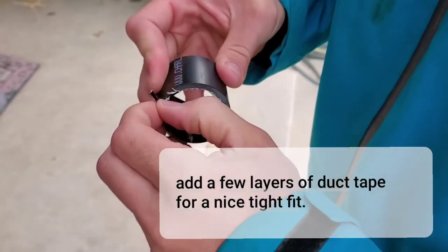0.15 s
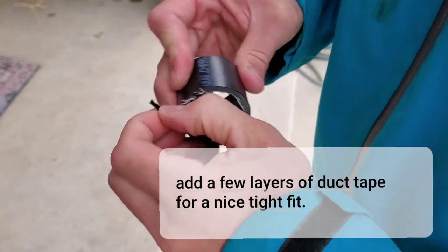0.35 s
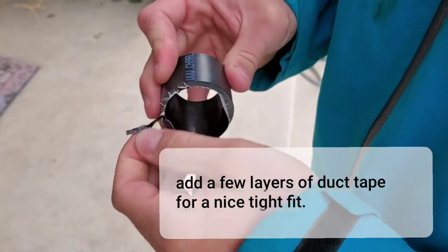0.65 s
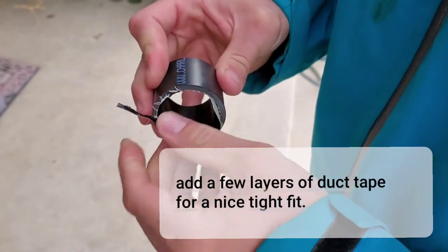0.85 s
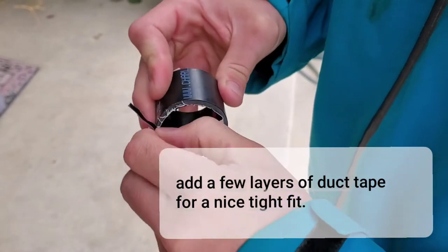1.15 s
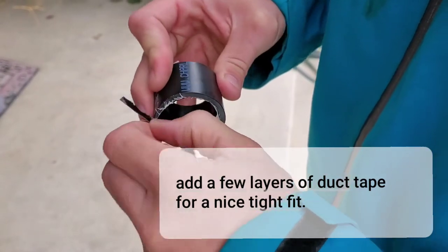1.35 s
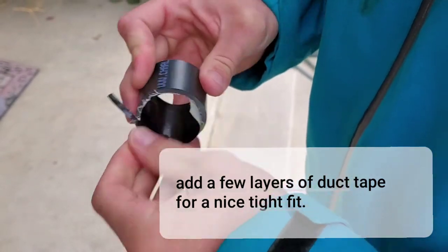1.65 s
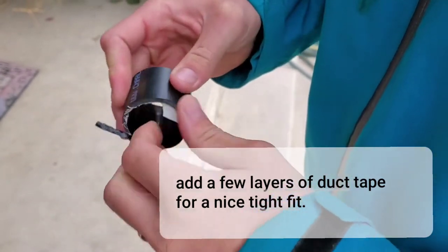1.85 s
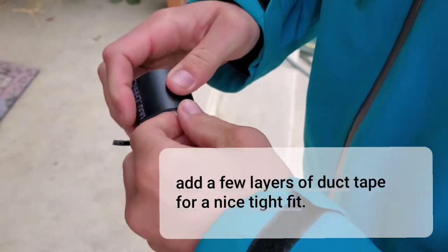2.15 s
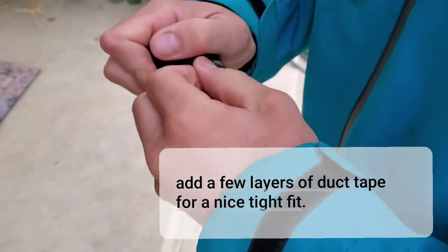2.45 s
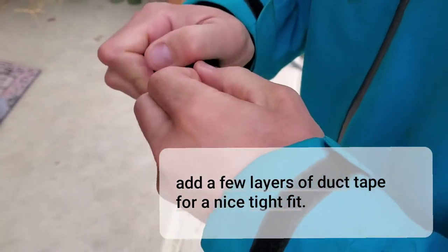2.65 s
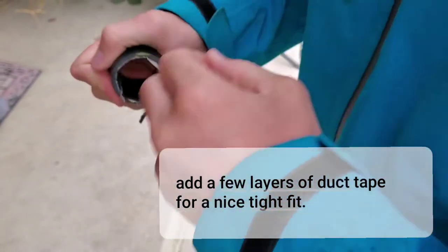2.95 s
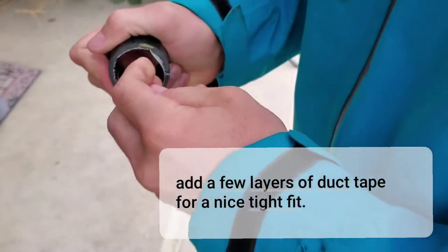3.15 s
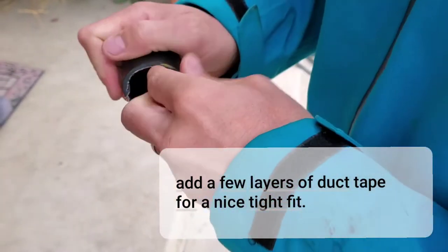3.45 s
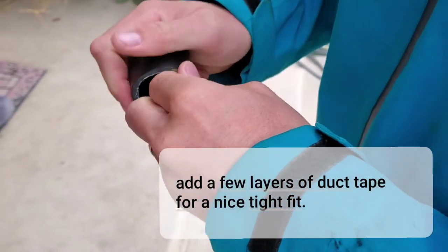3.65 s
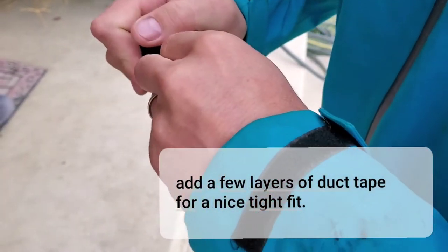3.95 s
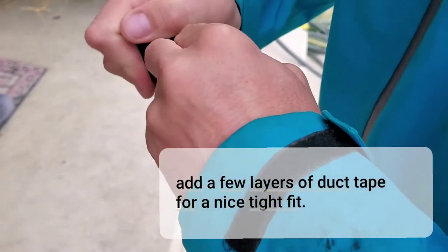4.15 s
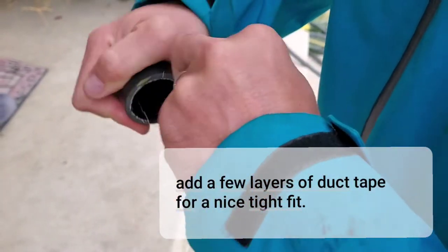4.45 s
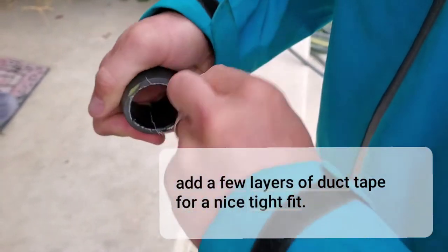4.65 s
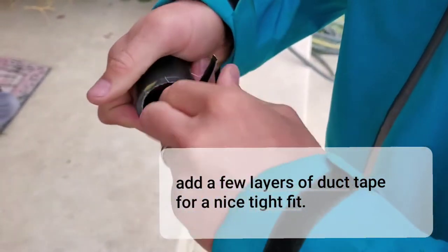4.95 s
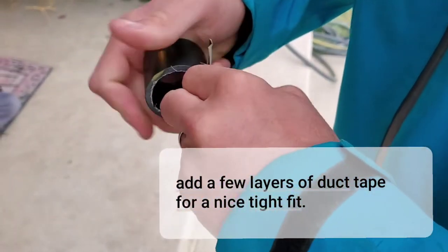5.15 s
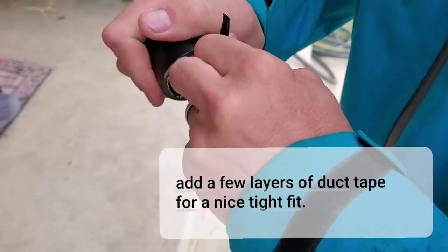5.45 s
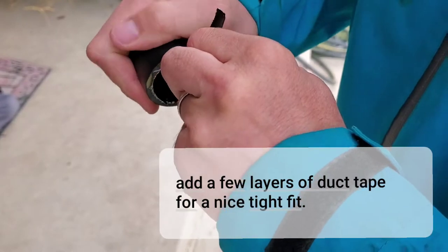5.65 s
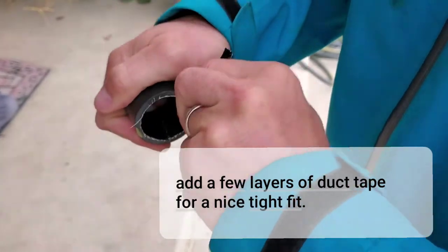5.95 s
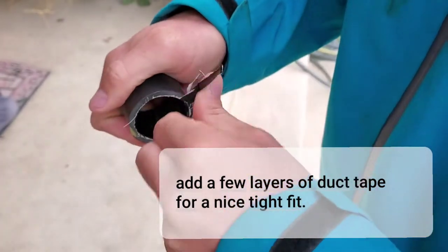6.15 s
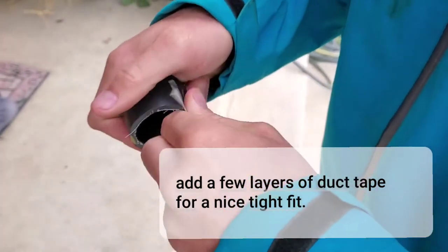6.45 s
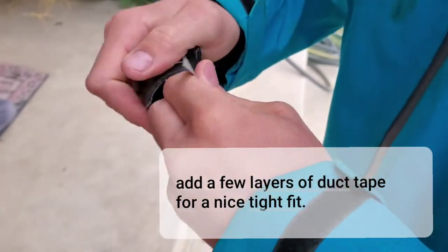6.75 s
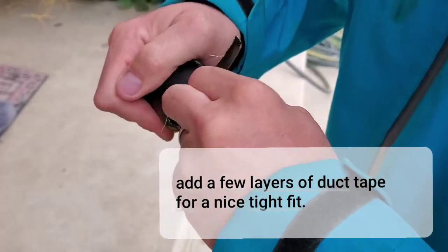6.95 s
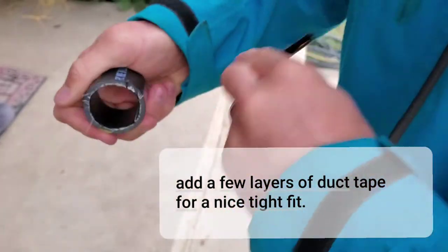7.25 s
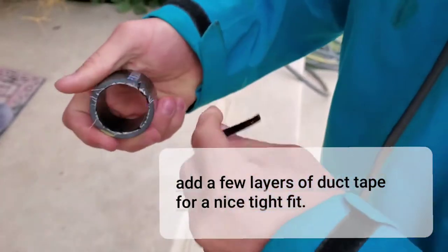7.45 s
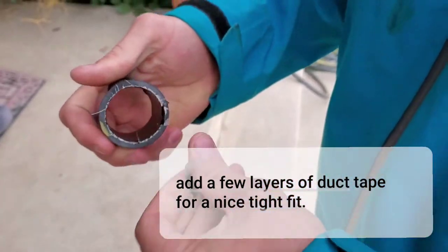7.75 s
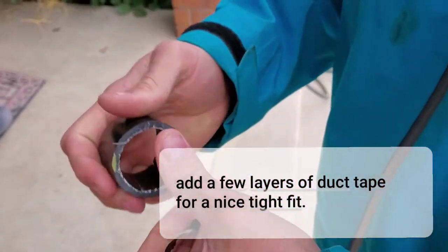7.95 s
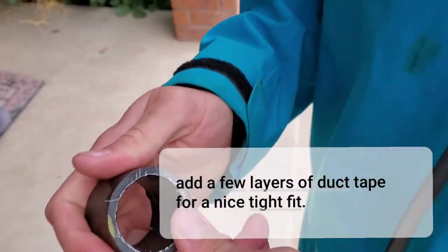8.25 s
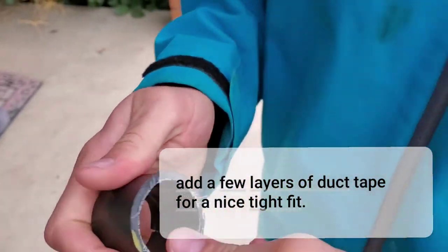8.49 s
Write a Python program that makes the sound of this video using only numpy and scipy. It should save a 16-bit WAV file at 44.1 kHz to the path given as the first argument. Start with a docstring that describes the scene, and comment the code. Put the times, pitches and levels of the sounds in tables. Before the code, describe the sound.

Close, sharp little rips of duct tape on a plastic pipe, among jacket rustles, handling thuds and a steady low hum.

```python
"""Duct tape is torn by hand off the end of a short plastic pipe, close to a hand-held microphone.
Threads part in runs of sharp snaps over crackling glue; both ring the taut tape and the pipe.
A nylon jacket swishes, flaps and faintly squeaks as the arms move, and handling adds dull bumps.
Behind it lie a steady low rumble, a faint hiss and two motor hums."""
import sys
import numpy as np
from scipy import signal
from scipy.fft import rfft, irfft, next_fast_len
from scipy.io import wavfile
from scipy.ndimage import uniform_filter1d

SR = 44100
rng = np.random.default_rng(int(sys.argv[2]) if len(sys.argv) > 2 else 0)


def dump(signal):
    """Clip the signal to [-1, 1] and save it as 16-bit WAV at the path in sys.argv[1]."""
    limited = np.clip(np.atleast_2d(signal).T, -1, 1)
    pcm = np.round(limited * 32767).astype(np.int16)
    wavfile.write(sys.argv[1], SR, pcm)


N = 380141
TIME = np.arange(N) / SR


def from_db(db):
    """Decibels to gain."""
    return 10 ** (np.asarray(db) / 20)


def unit_rms(x):
    """Scale to rms 1."""
    return x / np.sqrt(np.mean(x ** 2) + 1e-20)


def in_time(rows):
    """Interpolate each column of a time curve per sample."""
    times_s, *columns = np.transpose(rows)
    return [np.interp(TIME, times_s, column) for column in columns]


def at_hz(points, hz):
    """Interpolate a spectrum on a log-frequency axis."""
    knots_hz, values = np.transpose(points)
    return np.interp(np.log(hz + 1), np.log(knots_hz), values)


def butter(x, hz, kind, order=2):
    """Causal Butterworth filter."""
    return signal.sosfilt(signal.butter(order, hz, kind, fs=SR, output="sos"), x + 1e-18)


def band(x, low_hz, high_hz, order=2):
    """Causal band-pass."""
    return butter(x, [low_hz, high_hz], "band", order)


def resonator(x, hz, width_hz):
    """Two-pole resonance, peak gain 1."""
    r = np.exp(-np.pi * width_hz / SR)
    numerator = np.array([1, 0, -1]) * (1 - r * r) / 2
    return signal.lfilter(numerator, [1, -2 * r * np.cos(2 * np.pi * hz / SR), r * r], x + 1e-18)


def resonate(x, modes):
    """Parallel resonances with alternating signs."""
    return sum((-1) ** k * from_db(db) * resonator(x, hz, width_hz)
               for k, (hz, width_hz, db) in enumerate(modes))


def drift(rate_hz):
    """Smooth random curve, rms 1."""
    knots = rng.standard_normal(N // 20)
    return unit_rms(np.interp(TIME * rate_hz, np.arange(len(knots)), knots))


def evened(x, window_s):
    """Level out the slow swells of a noise; rms 1."""
    return x / np.sqrt(uniform_filter1d(np.mean(x ** 2, axis=0), int(window_s * SR)) + 1e-12)


# Left-right likeness: (frequency [Hz], correlation [-1..1])
STEREO_CORRELATION = [(60, .997), (130, .993), (290, .94), (640, .35), (1400, -.25), (3000, 0), (15000, 0)]


def stereo_noise(spectrum=((20, 0), (20000, 0))):
    """Coloured noise, alike on both sides in the bass, unrelated in the treble; rms 1."""
    size = next_fast_len(N)
    hz = np.arange(size // 2 + 1) * SR / size
    alike = at_hz(STEREO_CORRELATION, hz)
    mid, side = rfft(rng.standard_normal((2, size))) * from_db(at_hz(spectrum, hz))
    left_right = np.sqrt(1 + alike) * mid + np.sqrt(1 - alike) * side * [[1], [-1]]
    return unit_rms(irfft(left_right, size)[:, :N])


def room(x, t60_s=0.13, tail_db=-9):
    """Reflections add a short diffuse tail, different on each side."""
    t = TIME[:SR // 2]
    tail = rng.standard_normal((2, len(t))) * from_db(-60 * t / t60_s) * (t > .002)
    tail /= np.sqrt(np.sum(tail ** 2, axis=1, keepdims=True))
    return x + from_db(tail_db) * signal.fftconvolve(x, tail, axes=1)[:, :N]


# Background spectra: (frequency [Hz], relative density [dB])
RUMBLE_SPECTRUM = [(12, -45), (20, -2), (53, -30), (66, -5), (87, -1), (109, -10), (212, -18), (397, -28.5),
                   (474, -27), (890, -35), (1770, -41.5), (2200, -50), (2860, -69), (4840, -120)]
HISS_SPECTRUM = [(1060, -54), (1800, -54), (2400, -8), (2630, -10), (3090, -5), (3700, -3), (6650, -4),
                 (7540, -7.5), (13800, -11.5), (15500, -54)]
# Hiss envelope: (time [s], level [dB])
HISS_ENVELOPE = [(2.0, -66), (2.45, -71), (2.65, -75.5), (3.0, -66.5)]


def rumble_and_hiss(rumble_db=-45.5):
    """Steady low rumble; a faint hiss sinks while the hands are still."""
    rumble = from_db(rumble_db) * stereo_noise(RUMBLE_SPECTRUM)
    hiss = from_db(in_time(HISS_ENVELOPE)[0]) * stereo_noise(HISS_SPECTRUM)
    return rumble + hiss


# Steady hum: (frequency [Hz], relative level [dB])
STEADY_MOTOR = [(86.1, -44.5)]
# Wandering hum: (time [s], frequency [Hz], level [dB])
WANDERING_MOTOR = [(0.2, 133.2, -54), (0.8, 138.6, -54), (1.5, 143.3, -56), (2.42, 121.8, -52),
                   (4.65, 119.8, -48), (5.6, 121.8, -50), (6.3, 111.0, -47), (7.15, 115.1, -46),
                   (7.8, 109.0, -47), (8.4, 109.0, -48)]


def motors(steady_db=-0.5, steady_waver_db=1.5, wandering_waver_db=5):
    """One motor holds its speed, the other wanders; both hums waver in level."""
    steady = sum(from_db(db + steady_db + steady_waver_db * drift(7)) * np.sin(2 * np.pi * hz * TIME)
                 for hz, db in STEADY_MOTOR)
    hz, db = in_time(WANDERING_MOTOR)
    wandering = from_db(db + wandering_waver_db * drift(26)) * np.sin(2 * np.pi * np.cumsum(hz) / SR)
    return steady + wandering


# Cloth squeaks: (start [s], end [s], top pitch [Hz], level [dB])
SQUEAKS = [(5.8, 5.912, 947, -53), (6.58, 6.684, 915, -57.5), (6.785, 7.046, 341, -40),
           (7.14, 7.305, 500, -50), (7.298, 7.434, 308, -47), (7.879, 8.098, 231.5, -45.5),
           (8.001, 8.22, 326, -45), (8.3, 8.457, 1230, -49)]


def cloth_squeaks(pitch_arch=0.145, pitch_jitter=0.026, waver_db=2):
    """A sliding weave hums at a pitch that rises and falls with its speed."""
    squeaks = np.zeros(N)
    wobble = 1 + pitch_jitter * drift(90)
    waver = from_db(waver_db * drift(64))
    for start_s, end_s, top_hz, db in SQUEAKS:
        span = slice(int(start_s * SR), int(end_s * SR))
        speed = np.sin(np.linspace(0, np.pi, len(TIME[span])))
        hz = top_hz * (1 - pitch_arch * (1 - speed)) * wobble[span]
        squeaks[span] += from_db(db) * speed * waver[span] * np.sin(2 * np.pi * np.cumsum(hz) / SR)
    return squeaks


# Arm movements: (start [s], length [s], ease [s], relative swish level [dB],
# rasp offset [dB], sheen offset [dB], folds offset [dB])
ARM_STROKES = [(0.0, 0.18, 0.013, -66.5, -32, 0, -1), (0.22, 0.049, 0.013, -52, -14, 1, -4),
               (0.73, 0.13, 0.007, -64, -11, -2, -3), (0.98, 0.049, 0.0091, -65, -15, -7, 7),
               (1.275, 0.066, 0.0058, -64.5, 1, -21, -5), (1.48, 0.16, 0.034, -65.5, -10, -7, -2),
               (1.7, 0.18, 0.024, -62.5, -8, -5.5, 1), (1.995, 0.077, 0.0089, -65.5, 3, 1, 2),
               (2.225, 0.13, 0.0063, -83, 13.5, -11, -3), (2.771, 0.062, 0.026, -35.5, -3, -3.5, -4.5),
               (3.15, 0.63, 0.046, -60.5, -4, -6, 6), (3.92, 0.26, 0.035, -63.5, -15, -18, -6),
               (4.88, 0.21, 0.02, -53.5, -8, -4, 3.5), (5.254, 0.15, 0.023, -36.5, -7.5, -4.5, -11),
               (5.55, 0.092, 0.042, -55, -12, -1, 0), (5.779, 0.06, 0.031, -44.5, -1, -16, 2.5),
               (6.024, 0.2, 0.014, -38, -9.5, -5, -12.5), (6.3, 0.048, 0.018, -58, -11, -1, -3),
               (6.465, 0.13, 0.026, -46, -9, -5, -3), (6.813, 0.14, 0.022, -36.5, -6, -7.5, -9.5),
               (7.2, 0.15, 0.023, -41, -6.5, -7, -3.5), (7.523, 0.2, 0.028, -37.5, -5, -9, -10.5),
               (7.0, 1.75, 0.0067, -59.5, -7.5, -2, 5), (7.973, 0.099, 0.024, -37, -5, -9, -5),
               (8.228, 0.12, 0.02, -35.5, -2, -6.5, -11.5), (8.35, 0.12, 0.015, -41, -2.5, -4.5, -10.5)]


def arm_strokes():
    """Each stroke eases in, holds and eases out; envelopes of rasp, swish, sheen and folds."""
    t, power = TIME[::40], 0
    for start_s, length_s, ease_s, db, rasp_db, sheen_db, folds_db in ARM_STROKES:
        age_s = t - start_s
        speed = (np.tanh(age_s / (2 * ease_s)) - np.tanh((age_s - length_s) / (2 * ease_s))) / 2
        gains = from_db(db + np.array([rasp_db, 0, sheen_db, folds_db]))
        power = power + np.outer(gains, speed) ** 2
    return [np.interp(TIME, t, np.sqrt(p)) for p in power]


def microphone_sway(envelope, gain_db=-7):
    """Each arm stroke jostles the microphone with a soft low rumble."""
    return envelope * from_db(gain_db) * evened(band(stereo_noise(), 58, 125), window_s=.04)


def fold_flaps(envelope, lag_s=0.039, gain_db=-1):
    """The jacket's folds flap dully just after the arm moves."""
    flapping = np.interp(TIME - lag_s, TIME, envelope)
    return flapping * from_db(gain_db) * unit_rms(band(stereo_noise(), 133, 536))


# Nylon friction: (frequency [Hz], relative density [dB])
NYLON_SPECTRUM = [(410, -64), (700, -12), (1120, -5), (1170, -8), (1300, -10), (1620, -2.5), (2100, -4.5),
                  (2760, 2), (3860, 4), (4510, 3.5), (7860, -4.5), (14100, -3.5), (14800, -10.5),
                  (15400, -87)]


def jacket(rasp, swish, sheen, gain_db=2, flutter_db=1.5, direct_share=0.1, left_lead_s=.0004,
           echo_s=.0025, echo_swing=0.114, echo_gain=0.52):
    """Nylon slides on nylon: fluttering friction noise swells with each stroke in three bands."""
    direct = stereo_noise(NYLON_SPECTRUM)[0]
    direct = np.array([direct, np.roll(direct, int(left_lead_s * SR))])
    diffuse = stereo_noise(NYLON_SPECTRUM)
    friction = np.sqrt(direct_share) * direct + np.sqrt(1 - direct_share) * diffuse
    friction *= from_db(flutter_db * drift(60))
    for side in friction:   # a reflection off the moving body adds shifting peaks
        delay_s = echo_s * (1 + echo_swing * drift(3))
        side += echo_gain * np.interp(TIME - delay_s, TIME, side)
    bands = [(rasp, 700, 2500), (swish, 2500, 7200), (sheen, 7200, 17000)]
    return from_db(gain_db) * sum(envelope * unit_rms(band(friction, low_hz, high_hz, order=3))
                                  for envelope, low_hz, high_hz in bands)


# Bumps, relative levels: (time [s], boom [dB], thud [dB], ring [dB], scuff [dB], t60 [s])
HANDLING_BUMPS = [(0.731, -30, -39.5, -65, -52.5, 0.17), (1.108, -27, -52, -58, -79, 0.15),
                  (1.813, -18, -13.5, -34.5, -29.5, 0.25), (1.832, -14, -27.5, -37.5, -41.5, 0.69),
                  (2.043, -24.5, -36.5, -48, -51, 0.26), (2.65, -24, -24.5, -41, -63, 0.22),
                  (2.926, -21, -37, -41.5, -58.5, 0.79), (3.159, -21.5, -41, -40, -52, 1),
                  (3.233, -7, -11, -14.5, -32, 0.23), (3.261, -13.5, -31, -32, -42.5, 0.56),
                  (3.407, -5, -22.5, -28.5, -44, 0.6), (3.611, -14.5, -43.5, -40.5, -62, 0.34),
                  (4.114, -18, -45, -56.5, -61, 0.35), (4.882, -41, -32.5, -36, -38.5, 0.45),
                  (4.92, -8, -34, -39, -59, 0.45), (4.993, -14, -37.5, -42.5, -45, 0.67),
                  (5.147, -16.5, -39, -38, -49.5, 0.53), (5.257, -16, -55, -56, -49, 0.15)]
# Bump noise: (frequency [Hz], relative density [dB])
BUMP_SPECTRUM = [(21, -34), (35, -32), (54, 4), (95, 19.5), (142, -13.5), (174, -6), (254, -11), (451, -19),
                 (499, -41), (552, -43), (610, -31), (1260, -44.5), (1620, -53), (2250, -51),
                 (14000, -67.5)]
# Resonances stirred by bumps: (frequency [Hz], width [Hz], gain [dB])
BUMP_MODES = [(181, 16.2, 0), (260, 125, -9), (420, 21, -8.5), (480.4, 20, -6.5), (641, 91, -15),
              (735, 14, -10.5), (987, 140, -17.5), (1657, 174, -21)]


def handling_bumps(rise_s=0.0067, boom_db=-6, thud_db=1, scuff_db=2):
    """A bump swells in milliseconds and dies away as a low boom, a thud, a hollow ring and a scuff."""
    power = np.zeros((4, N))
    for time_s, *levels_db, t60_s in HANDLING_BUMPS:
        at = int(time_s * SR)
        age_s = TIME[:min(SR, N - at)]
        envelope = (1 - np.exp(-age_s / rise_s)) * from_db(-60 * age_s / t60_s)
        power[:, at:at + len(age_s)] += np.outer(from_db(levels_db), envelope) ** 2
    shudder = stereo_noise(BUMP_SPECTRUM)
    boom = from_db(boom_db) * evened(band(shudder, 54, 106, order=3), window_s=0.0248)
    thud = from_db(thud_db) * evened(band(shudder, 163, 340), window_s=0.0228)
    ring = evened(resonate(stereo_noise(), BUMP_MODES), window_s=0.035)
    scuff = from_db(scuff_db) * unit_rms(band(shudder, 1250, 5500))
    return sum(np.sqrt(p) * part for p, part in zip(power, [boom, thud, ring, scuff]))


# Tape and pipe resonances: (frequency [Hz], width [Hz], gain [dB])
TAPE_PIPE_MODES = [(1450, 210, -6.5), (2640, 420, -3), (3620, 900, -2.5), (4870, 1110, 3), (5410, 580, 1.5),
                   (6640, 480, 6), (8870, 1750, -4.5), (11300, 720, 2.5), (13900, 1000, -5)]


def tape_ring(force, direct_db=-9):
    """A force rings the taut tape and the pipe; some of it is heard directly."""
    return resonate(force, TAPE_PIPE_MODES) + from_db(direct_db) * force


# Peels: (start [s], hardest pull [s], end [s], glue level [dB], relative thread level [dB])
PEEL_RUNS = [(0.408, 0.428, 0.448, -45, -46), (2.73, 2.752, 2.77, -26, -23),
             (4.316, 4.37, 4.395, -45, -27.5), (5.742, 5.775, 5.83, -45, -28)]


def glue_crackle(grains_per_s=6000, spread_db=3):
    """Peeling glue parts in tiny grains, louder the harder the pull."""
    fires = rng.random(N) < grains_per_s / SR
    strength = from_db(spread_db * rng.standard_normal(N).clip(-2, 2))
    grains = band(fires * strength * rng.standard_normal((2, N)), 1300, 13000, order=1)
    envelope = sum(from_db(db) * np.sqrt(np.interp(TIME, [start_s, peak_s, end_s], [0, 1, 0]))
                   for start_s, peak_s, end_s, db, _ in PEEL_RUNS)
    return envelope * unit_rms(tape_ring(grains))


def small_threads(gap_s=.0055, gap_scatter=0.45, spread_db=3.5):
    """In a peel the weave lets go thread by thread, nearly evenly: (time [s], level [dB])."""
    threads = []
    for start_s, peak_s, end_s, _, db in PEEL_RUNS:
        lateness, weakness = rng.standard_normal((2, 64))
        times_s = start_s + gap_s * (np.arange(len(lateness)) + 1 + gap_scatter * lateness)
        pulls = np.interp(times_s, [start_s, peak_s, end_s], [0, 1, 0])
        threads += [(time_s, db + 10 * np.log10(pull) - spread_db * weak)
                    for time_s, pull, weak in zip(times_s, pulls, weakness) if pull > 0]
    return threads


# Loudest threads: (time [s], relative level [dB])
LOUD_THREADS = [(0.4034, -40.5), (0.4145, -31), (0.425, -31), (0.431, -34), (0.4402, -30.5), (0.78, -37),
                (2.3609, -27), (2.6995, -26), (2.7128, -23), (2.7197, -33), (2.7322, -25), (2.7402, -23),
                (2.7458, -23), (2.7531, -21), (2.7564, -17), (2.7644, -14), (2.7681, -21), (4.2895, -31),
                (4.3185, -41), (4.3259, -28.5), (4.3427, -30), (4.3839, -22.5), (4.3871, -22),
                (4.3921, -25), (4.4052, -26.5), (4.4219, -27), (4.4775, -30), (4.4815, -29.5),
                (4.4964, -31), (4.5142, -26), (4.5436, -28), (5.7014, -27.5), (5.7313, -29), (5.759, -42),
                (5.8027, -21.5), (5.8097, -27), (5.828, -26.5), (7.0193, -28), (7.0283, -28), (7.0326, -31),
                (7.0413, -28.5), (7.0937, -25.5), (7.0962, -16.5), (7.0989, -24)]
# Low and high tone of the snaps from each time on; fuller as the strip comes free:
# (start [s], low offset [dB], high offset [dB])
SNAP_COLOURS = [(0, -10, 1), (0.6, -25, -10.5), (2.76, -6.5, -6), (4.2, -24, -5), (5.6, -27, -3.5),
                (6.9, -22.5, -0.5)]


def thread_snaps(rise_s=.0002, decay_s=.00075, gain_db=21, low_db=14, high_db=2, ring_db=-4):
    """Each parting thread is a millisecond burst of tiny fractures with a pitch of its own."""
    t = TIME[:SR // 100]
    pitches_hz = rng.uniform(3500, 13000, 200)
    noises = rng.standard_normal((200, 2, len(t)))
    threads = list(LOUD_THREADS) + small_threads()
    band_drive = np.zeros((3, 2, N))
    for (time_s, db), noise, hz in zip(threads, noises, pitches_hz):
        burst = noise * (1 - np.exp(-t / rise_s)) * np.exp(-t / decay_s)
        burst += from_db(ring_db) * resonator(burst, hz, width_hz=2100)
        burst /= np.sqrt(np.sum(burst ** 2, axis=1, keepdims=True))
        _, low_offset_db, high_offset_db = [row for row in SNAP_COLOURS if row[0] <= time_s][-1]
        gains = from_db(db + np.array([low_offset_db + low_db, 0, high_offset_db + high_db]))
        at = int(time_s * SR)
        band_drive[:, :, at:at + len(t)] += gains[:, None, None] * burst
    low, middle, high = band_drive
    force = band(low, 1150, 2200) - band(middle, 2750, 7300) + band(high, 8300, 15000)
    return from_db(gain_db) * tape_ring(force)


def scene():
    """Tape, jacket and bumps lie a little to the left, which shows in the treble."""
    tape = room(glue_crackle() + thread_snaps())
    rasp, swish, sheen, folds = arm_strokes()
    cloth = jacket(rasp, swish, sheen) + cloth_squeaks() + fold_flaps(folds)
    near = tape + cloth + microphone_sway(swish) + handling_bumps()
    left_tilt = butter(near, 900, "high") * [[.25], [-.28]]
    return rumble_and_hiss() + motors() + near + left_tilt


def record(dry, low_cut_hz=35, high_cut_hz=15950, notch_hz=7750, right_top_hz=13000):
    """Band-limited microphone; its right port has a notch and a duller top."""
    left, right = butter(dry, low_cut_hz, "high")
    right = right - resonator(right, notch_hz, width_hz=1100)
    right = butter(right, right_top_hz, "low")
    return signal.sosfilt(signal.cheby2(16, 50, high_cut_hz, fs=SR, output="sos"), [left, right])


dry = scene()
out = record(dry)
dump(out)
```